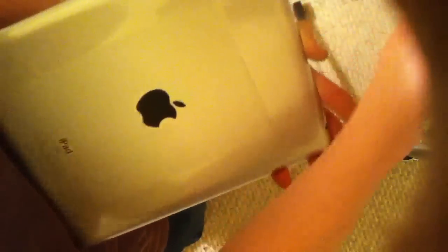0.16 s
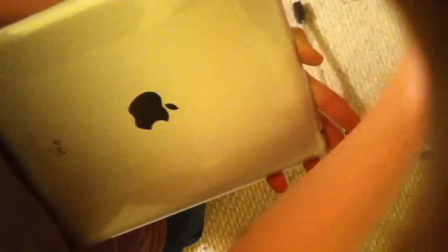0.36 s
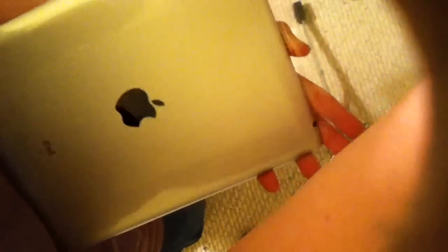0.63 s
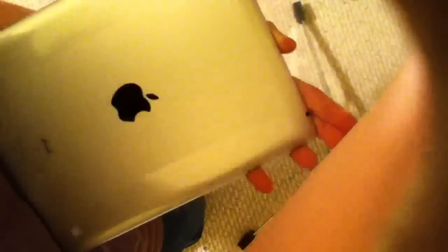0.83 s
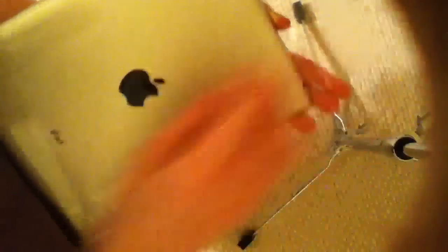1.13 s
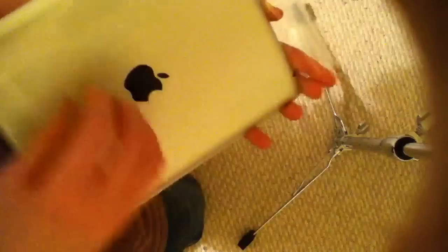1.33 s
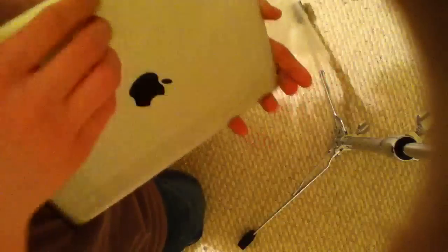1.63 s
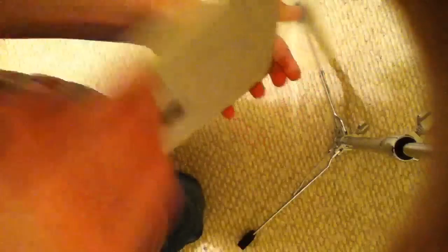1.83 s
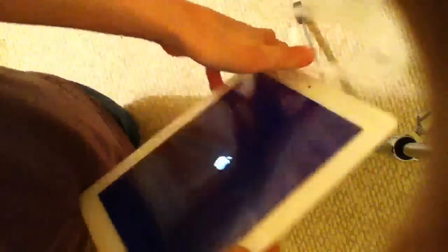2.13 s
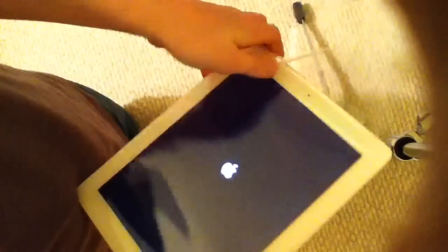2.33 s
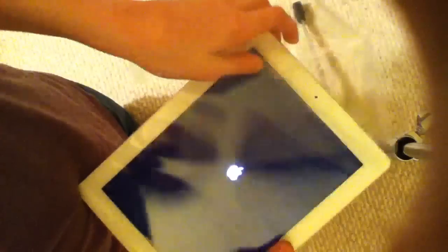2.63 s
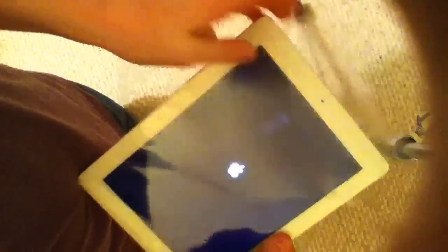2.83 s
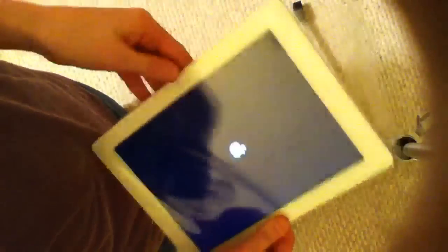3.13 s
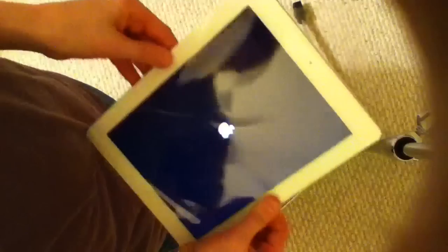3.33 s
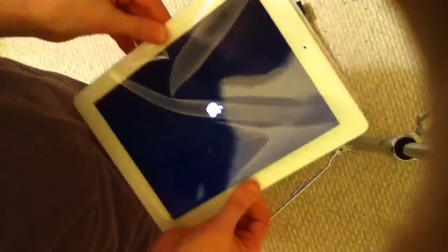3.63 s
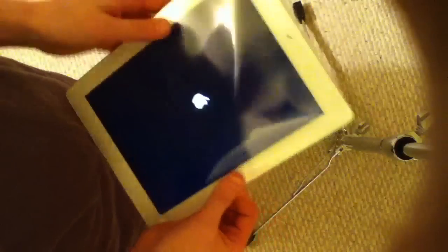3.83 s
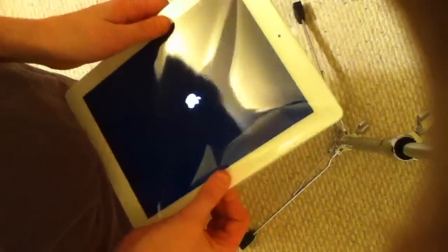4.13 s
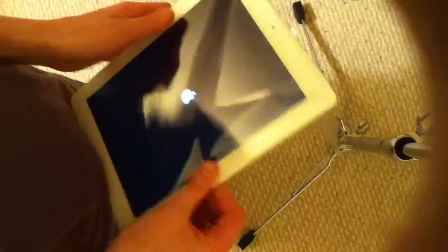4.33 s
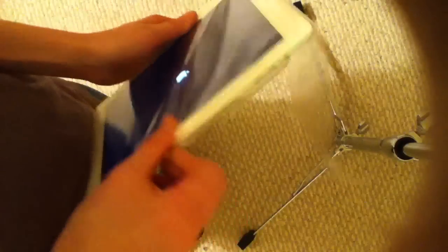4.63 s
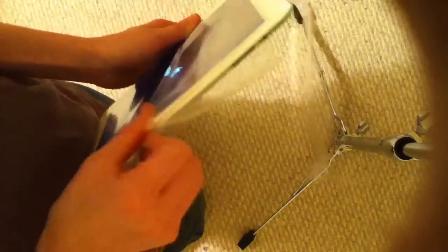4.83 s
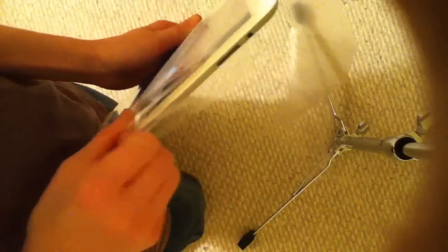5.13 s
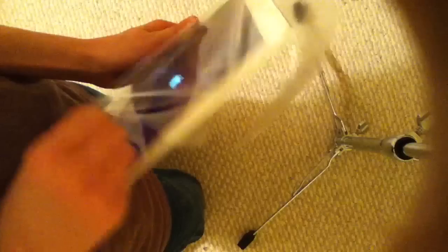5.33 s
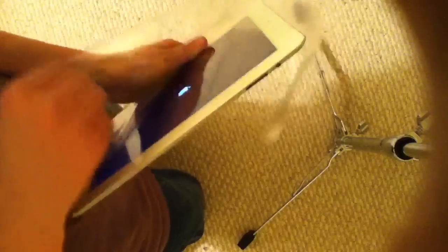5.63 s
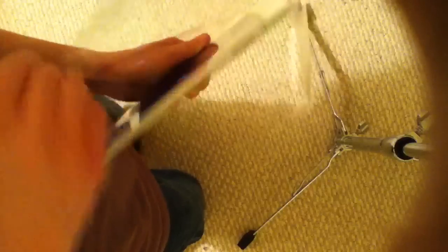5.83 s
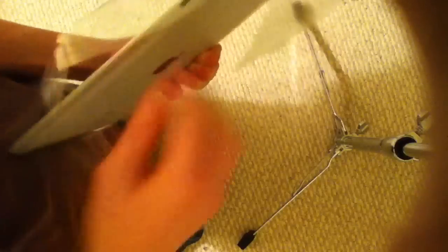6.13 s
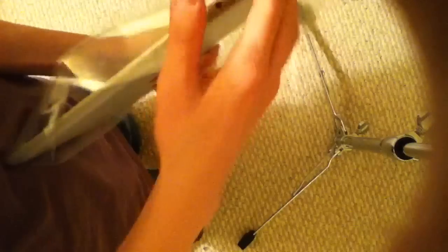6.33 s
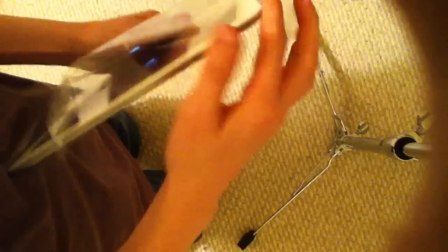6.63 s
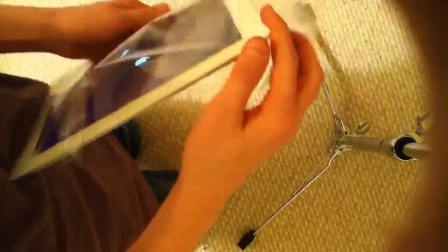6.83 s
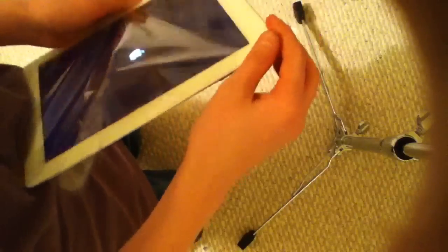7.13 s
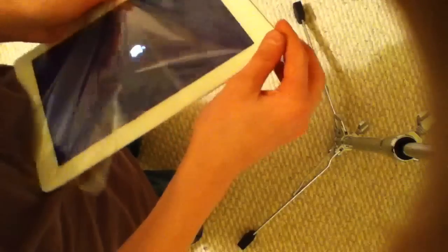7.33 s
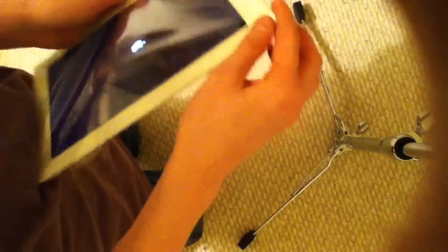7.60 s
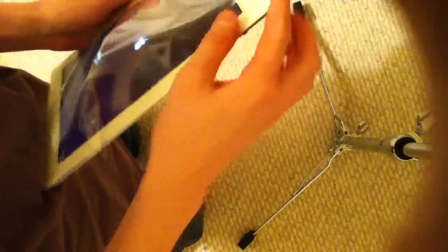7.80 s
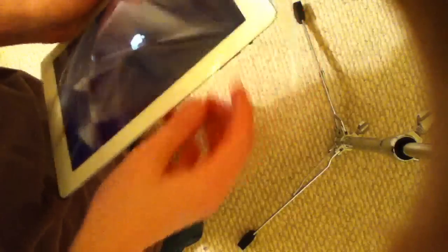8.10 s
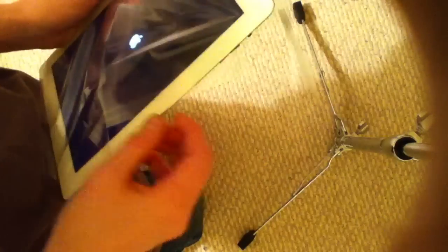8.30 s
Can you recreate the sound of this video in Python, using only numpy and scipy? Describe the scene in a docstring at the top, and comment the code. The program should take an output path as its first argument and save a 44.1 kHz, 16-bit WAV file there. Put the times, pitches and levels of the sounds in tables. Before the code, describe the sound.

Hands peel thin clear film from a glass-and-metal tablet. Sharp, bright snaps come at once, then thin to near quiet after a second. Crackles return irregularly, crowd together around the middle with the loudest scrunch, then scatter and shrink away. Close microphone in a carpeted room with a short soft tail, faint hiss and a very thin high whine.

```python
"""Hands peel a thin plastic film off a flat glass-and-metal slab held over a lap in a carpeted room.
Strong snaps come at once, then fewer; they crowd again, thickest past the middle, and shrink at the end.
Each snap is a crease flipping: short damped tones. Scrunches and rustling are filtered ticks and noise.
Nearby echoes and a short room tail answer every sound; steady hiss and a thin high whine lie below."""
import sys
import numpy as np
from scipy import signal
from scipy.fft import rfft, irfft, next_fast_len
from scipy.io import wavfile
from scipy.ndimage import uniform_filter1d

SR = 44100
rng = np.random.default_rng(int(sys.argv[2]) if len(sys.argv) > 2 else 0)


def int16_out(signal):
    """Quantize to a 16-bit WAV file."""
    q = np.round(np.clip(np.atleast_2d(signal).T, -1, 1) * 32767)
    wavfile.write(sys.argv[1], SR, q.astype(np.int16))


N = 373086  # length in samples

# how loudly the hands slide on the film: start_s, level_db (straight lines between rows)
RUSTLE_LEVEL = [(0, -38.5), (.1, -60.5), (.75, -58), (0.999, -64), (1.6, -53), (1.95, -57.5), (2.19, -48.5),
                (2.5, -58), (2.85, -61), (3.05, -56), (3.15, -46.5), (3.32, -54.5), (4.42, -54.5),
                (4.549, -45.5), (4.76, -68), (5.12, -65.5), (5.35, -38.5), (5.48, -37.5), (5.58, -56),
                (6.0, -49), (6.19, -54.5), (7.15, -53.5), (7.29, -62.5), (7.45, -55.5), (7.85, -60),
                (8.1, -54), (8.24, -69), (8.46, -68.5)]
# tone colour of the rustling film: pitch_hz, level_db (relative)
FILM_COLOUR = [(500, -30), (1000, -14), (2000, -6), (3300, -6), (4800, 0), (5600, -3), (6400, -13),
               (9000, -30)]
# tone colour of the film's finest creases: pitch_hz, level_db (relative)
SHEEN_COLOUR = [(4500, -55), (6500, -4), (8500, 4.5), (10500, 3), (12500, -7), (15000, -21), (16500, -13)]
USUAL_HZ = 4200  # usual ring of a snap


def amp(db):
    """Turns a level in dB into a gain."""
    return 10 ** (np.asarray(db) / 20)


def rms_one(x):
    """Scales a sound to an average strength (rms) of 1."""
    return x / np.sqrt(np.mean(x ** 2) + 1e-20)


def curve(rows, s):
    """Reads a table of start_s and value at the given times."""
    return np.interp(s, *np.transpose(rows))


def at_hz(points, hz):
    """Reads a table of pitch_hz and value, with pitch on a log scale."""
    points = np.array(points)
    return np.interp(np.log(np.maximum(hz, 1)), np.log(points[:, 0]), points[:, 1])


def coloured(x, spectrum):
    """Filters a sound by a tone-colour table and scales it to rms 1."""
    size = next_fast_len(len(x))
    gain = amp(at_hz(spectrum, np.fft.rfftfreq(size, 1 / SR)))
    filtered = irfft(rfft(x, size) * gain, size)[:len(x)]
    return rms_one(filtered)


def grains(per_s, spread_db, smooth, low_hz, high_hz):
    """Random ticks of very uneven size, each ringing briefly at one of six pitches, over friction noise."""
    sizes = amp(spread_db * np.minimum(rng.exponential(1, N), 4)) * rng.choice([-1, 1], N)
    ticks = sizes * (rng.random(N) < per_s / SR) + 1e-18  # never quite zero
    dealt = rng.integers(0, 6, N)
    ringing = 0
    for k, hz in enumerate(np.geomspace(low_hz, high_hz, 6)):
        edges = [hz / 1.3, min(hz * 1.3, 0.45 * SR)]
        band = signal.butter(2, edges, "band", fs=SR, output="sos")
        ringing = ringing + signal.sosfilt(band, ticks * (dealt == k)) / np.sqrt(hz)
    return rms_one(ringing) + smooth * rng.standard_normal(N)


def pops(hz, level_db, t60, rise, spread, top_hz, count):
    """One short pop a row: fading tones loosely spaced about its pitch, with its peak at its level."""
    t = np.arange(round(0.02 * SR)) / SR
    draw = rng.random((len(hz), count, 3))
    scatter = np.exp(spread * (2 * (np.arange(count) + draw[..., 0]) / count - 1))
    tone_hz = np.minimum(hz[:, None] * scatter, top_hz)
    phase = 2 * np.pi * (tone_hz[..., None] * t + draw[..., 1:2])
    shape = (1 - np.exp(-t / rise)) ** 2 * amp(-60 * t / t60)
    pop = shape * np.sum((0.42 + draw[..., 2:3]) * np.sin(phase), axis=1)
    return amp(level_db)[:, None] * pop / np.abs(pop).max(axis=1, keepdims=True)


def snaps():
    """A crease flips: the facet rings for a few cycles, with a bright crack and a thump of pushed air."""
    # larger creases snapping through: start_s, ring_db, ring_hz, crack_db (peaks before filtering)
    big_snaps = [(0.0044, -8.5, 4000, -3.5), (0.09, -25.5, 2120, -40), (0.1766, -28, 4000, -32),
                 (0.1963, -6.5, 4280, -3.5), (0.2006, -9.5, 3980, -5), (0.3654, -9, 4800, -2.5),
                 (0.512, -8.5, 4440, -3.5), (0.5154, -3.5, 5050, -23), (0.5485, -10, 4280, -0.5),
                 (0.5514, -6, 4300, -4.5), (0.5602, -5, 3860, -29), (0.6001, -18, 3900, -39),
                 (0.6448, -10.5, 2860, -33), (0.8107, -25, 3980, -29), (1.0675, -39, 4100, -55),
                 (1.1564, -34, 1380, -58.5), (1.6255, -13, 3000, -25), (1.7859, -22.5, 5120, -25.5),
                 (1.8528, -31, 4170, -40), (2.0185, -12, 3470, -19), (2.0539, -18.5, 3750, -28),
                 (2.082, -7, 3870, -12.5), (2.1708, -29.5, 4100, -19.5), (2.2408, -5.5, 3950, -9),
                 (2.2624, -4, 4220, -1.5), (2.445, -24.5, 5000, -22.5), (2.6968, -31, 3780, -39),
                 (2.8982, -16, 3860, -17.5), (2.912, -10.5, 3840, -33), (2.9875, -18, 3710, -41),
                 (2.9937, -20.5, 3740, -30), (3.1698, -20, 2570, -29), (3.1784, -25, 4400, -22),
                 (3.569, -14.5, 1850, -15.5), (3.5908, -18, 4160, -32.5), (3.606, -15, 5500, -37),
                 (3.6128, -13, 4900, -9), (3.6281, -6, 4850, -17), (3.6553, -10, 4800, -9),
                 (3.662, -14, 5000, -16), (3.699, -20.5, 4900, -13.5), (3.8316, -7.5, 4400, -1.5),
                 (3.8371, -4, 5600, -11), (3.8503, -8, 4430, -19), (3.855, -17.5, 4160, -30),
                 (3.9253, -29, 3970, -28), (4.1919, -34, 3500, -42), (4.2135, -25, 4000, -38),
                 (4.2614, -28, 3900, -35), (4.2826, -27.5, 3600, -31.5), (4.3537, -33, 4320, -33.5),
                 (4.4356, -24, 3920, -30), (4.4744, -12.5, 4230, -15.5), (4.5566, -6, 5400, -11),
                 (4.6053, -22, 5230, -6), (4.6172, -2.5, 4970, -13), (4.6226, -15, 3800, -10),
                 (4.6732, -12.5, 4400, -22), (4.69, -8, 4370, -13), (4.6935, -21, 4600, -13.5),
                 (4.94, -18.5, 4860, -10), (4.9444, -25, 4800, -19.5), (5.1293, -19, 4520, -23.5),
                 (5.1822, -19, 4000, -46.5), (5.2166, -3.5, 4200, -10), (5.269, -19, 4360, -11),
                 (5.3193, -1.5, 3630, 0), (5.3255, -7, 3970, -2), (5.3688, -1, 4650, -8),
                 (5.3744, -9.5, 3350, -21.5), (5.4011, -11, 3500, -13), (5.4156, -20, 3500, -18),
                 (5.444, -13, 4000, -13.5), (5.4604, -6.5, 4020, -18.5), (5.4658, -22.5, 4170, -16.5),
                 (5.4827, -16, 4100, -27), (5.5198, -5.5, 4170, -28), (5.5362, -9, 3980, -12),
                 (5.6039, -26.5, 3860, -30.5), (5.652, -19, 2880, -42.5), (5.7152, -20.5, 3950, -49.5),
                 (5.728, -20, 2580, -27), (5.7378, -22, 3100, -47), (5.7719, -27, 3900, -23.5),
                 (5.7905, -20, 1340, -43), (5.8106, -19.5, 3660, -28.5), (5.8998, -24, 2830, -49),
                 (5.9341, -26, 3590, -33.5), (5.959, -22, 2870, -53), (5.969, -17.5, 4000, -19),
                 (6.0349, -19, 3160, -22), (6.2028, -25, 4560, -28), (6.2532, -27, 5600, -35),
                 (6.3465, -5.5, 4060, -11.5), (6.3504, -8, 3970, -7.5), (6.3811, -4, 4560, -17),
                 (6.4404, -17.5, 4160, -30), (6.4872, -27.5, 4860, -32), (6.5701, -24, 3600, -35),
                 (6.8169, -15.5, 4800, -22.5), (6.8473, -21.5, 4180, -22.5), (6.8798, -20, 4320, -48),
                 (7.0336, -20, 3770, -29), (7.056, -23, 3760, -46), (7.0626, -19.5, 3360, -21),
                 (7.0916, -22, 4350, -35), (7.1081, -11, 4700, -14.5), (7.1397, -6.5, 4300, -12),
                 (7.1775, -15, 4200, -44), (7.224, -31, 4090, -29), (7.2477, -30, 4130, -31.5),
                 (7.3189, -18, 4220, -15), (7.378, -16, 4950, -23), (7.413, -22, 3500, -24),
                 (7.4224, -17, 3760, -31), (7.4342, -18.5, 3800, -20), (7.4472, -22, 4150, -16),
                 (7.4819, -22, 4000, -40), (7.522, -29, 4080, -47), (7.5803, -29, 3440, -35),
                 (7.6073, -14, 4200, -19.5), (7.7053, -25, 4420, -26.5), (7.7532, -25, 3740, -30.5),
                 (7.9789, -18, 3870, -52), (8.0111, -13.5, 4500, -17.5), (8.0236, -21, 4400, -41),
                 (8.0602, -18, 2660, -34), (8.1233, -5, 4180, -23), (8.252, -28.5, 4140, -23),
                 (8.3141, -38, 1690, -75.5), (8.3487, -31.5, 3300, -65.5)]
    # base level of the thump, for a 0 dB ring at the usual pitch: start_s, level_db
    thump_level = [(0, -28), (.7, -22), (1.6, -48), (2.3, -27), (3.2, -29.5), (3.7, -38), (4.4, -37.5),
                   (4.9, -53), (5.35, -31), (6.0, -37.5), (7.1, -32.5), (7.6, -44), (8.46, -40)]
    thump_follows = 0.53  # share of the ring's dB
    thump_db_per_octave, thump_scatter_db = -4.5, 4.5  # lower rings thump more

    s, ring_db, ring_hz, crack_db = np.r_[big_snaps, small_snaps()].T
    octaves = np.log2(ring_hz / USUAL_HZ)
    thump_db = curve(thump_level, s) + thump_follows * ring_db + thump_db_per_octave * octaves
    thump_db = thump_db + thump_scatter_db * rng.standard_normal(len(s))
    flat = np.ones(len(s))

    ring = pops(ring_hz, ring_db, t60=0.0025, rise=0.0001, spread=0.26, top_hz=5380, count=5)
    # wider facets answer an octave below, the more so the bigger the thump
    wide_db = (ring_db + thump_db) / 2 - 4
    wide = pops(ring_hz / 2, wide_db, t60=0.004, rise=0.0002, spread=0.5, top_hz=4000, count=5)
    pop = signal.sosfilt(signal.butter(2, 800, "high", fs=SR, output="sos"), ring + wide)
    crack = pops(9800 * flat, crack_db, t60=0.0035, rise=0.0001, spread=0.4, top_hz=15500, count=14)
    pop = pop + signal.sosfilt(signal.butter(2, 10500, fs=SR, output="sos"), crack)
    thump = pops(600 * flat, thump_db, t60=0.0066, rise=0.0007, spread=0.79, top_hz=1500, count=3)
    pop = pop + signal.sosfilt(signal.butter(2, 220, "high", fs=SR, output="sos"), thump)

    out = np.zeros(N + pop.shape[1])
    for start, one in zip(np.round(s * SR).astype(int), pop):
        out[start:start + len(one)] += one
    return out[:N]


def small_snaps():
    """Lesser creases flip at random, more often and louder when the hands rustle more; rows for snaps()."""
    per_s, crowding = 7.6, 0.6  # average rate; how much rustle draws them
    over_rustle_db, scatter_db = 18, 8  # near the loudest, above the rustle; most fall below it
    crack_step_db = -6  # least drop from ring to crack

    draw = rng.random((round(per_s * N / SR), 4))
    t = np.arange(N) / SR
    chance = np.cumsum(amp(crowding * curve(RUSTLE_LEVEL, t)))
    s = np.interp(draw[:, 0] * chance[-1], chance, t)
    ring_db = curve(RUSTLE_LEVEL, s) + over_rustle_db + scatter_db * np.log(draw[:, 1] + 0.064)
    ring_hz = USUAL_HZ * np.exp(0.6 * draw[:, 2] - 0.4)
    crack_db = ring_db + crack_step_db - 8 * draw[:, 3]
    return np.c_[s, ring_db, ring_hz, crack_db]


def scrunches():
    """Bursts of dense creasing start fast and fade, bright from the film, duller from hand and slab."""
    # scrunches and slaps, many creases at once: start_s, length_s, film_db, body_db, body_hz
    bursts = [(0.626, 0.085, -36.5, -38, 507), (0.833, 0.066, -62, -51.5, 1180),
              (1.848, 0.011, -45.5, -50.5, 600), (2.155, 0.034, -40.5, -47.5, 1000),
              (2.609, 0.13, -50, -55.5, 1210), (2.875, 0.064, -43, -57, 1500),
              (2.907, 0.051, -33, -32.5, 1750), (2.988, 0.0097, -35.5, -61, 1500),
              (3.152, 0.076, -36, -47, 1500), (3.409, 0.15, -47, -60, 990), (3.845, 0.03, -64, -46, 497),
              (4.459, 0.025, -43, -43.5, 596), (4.765, 0.05, -59.5, -46.5, 496),
              (5.375, 0.039, -30, -45, 1200), (5.903, 0.026, -39.5, -42.5, 1150),
              (7.055, 0.017, -33, -60, 1500), (7.413, 0.033, -43.5, -54, 1000)]
    sheen_db = -9  # beside the film's main sound

    t = np.arange(N) / SR
    film, body = np.zeros(N), np.zeros(N)
    knead = grains(1500, spread_db=4.5, smooth=0.3, low_hz=293, high_hz=3000)
    for start, length, film_db, body_db, body_hz in bursts:
        span = slice(round(start * SR), round((start + length) * SR))
        u = (t[span] - start) / length  # 0 to 1 through the burst
        shape = np.clip(np.minimum(u / 0.17, (1 - u) / 0.5), 0, 1)
        band = signal.butter(2, [body_hz / 3.0, body_hz * 2.4], "band", fs=SR, output="sos")
        film[span] += amp(film_db) * shape
        body[span] += amp(body_db) * shape * rms_one(signal.sosfilt(band, knead[span]))
    crush = grains(3000, spread_db=4.0, smooth=0.6, low_hz=1500, high_hz=11000)
    bright = coloured(crush, FILM_COLOUR) + amp(sheen_db) * coloured(crush, SHEEN_COLOUR)
    return body + film * bright


def rustle():
    """Skin drags over the film: fine ticks in friction noise, and a dull rumble through the slab."""
    # tone colour of the handled slab and lap: pitch_hz, level_db (relative)
    slab_colour = [(120, 7), (250, -4), (500, 0.5), (900, -2.5), (1800, -8.5), (4000, -32.5)]
    usual_db, sheen_db, rumble_db = -55, -62, -63.5  # levels when the rustle is at its usual strength
    sheen_follows, rumble_follows = 1, 0.74  # share of the rustle's swing in dB

    film_db = curve(RUSTLE_LEVEL, np.arange(N) / SR)
    swing = film_db - usual_db
    film = amp(film_db)
    sheen = amp(sheen_db + sheen_follows * swing)
    body = amp(rumble_db + rumble_follows * swing)
    # the grip wavers by about 2 dB, slower than 25 Hz
    slow = signal.sosfilt(signal.butter(2, 25, fs=SR, output="sos"), rng.standard_normal(N))
    grip = amp(2.1 * rms_one(slow))
    drag = grip * grains(600, spread_db=3.7, smooth=1.3, low_hz=1200, high_hz=9000)
    rumble = grains(300, spread_db=2.5, smooth=1.2, low_hz=200, high_hz=1500)
    bright = film * coloured(drag, FILM_COLOUR) + sheen * coloured(drag, SHEEN_COLOUR)
    return bright + body * coloured(rumble, slab_colour)


def echoes(x):
    """A few single, slightly dulled reflections from near surfaces."""
    # reflections from slab, lap, floor and walls: delay_s, level_db (in the bass; less treble)
    reflections = [(.0036, -15), (.0061, -22.5), (.0089, -19.5), (0.0149, -22), (0.018, -26.5)]
    taps = np.zeros(round(0.03 * SR))
    for delay, level_db in reflections:
        taps[round(delay * SR)] += amp(level_db)
    dulled = signal.lfilter([0.6], [1, -0.4], taps)
    return signal.fftconvolve(x, dulled)[:N]


def room(x, count=6):
    """The hands keep moving, so every 40 ms of sound meets one of several echo patterns."""
    step = 1764  # 40 ms in samples
    place = np.repeat(rng.integers(0, count, N // step + 1), step)[:N]
    # short crossfades between the patterns
    share = [uniform_filter1d(1.0 * (place == k), size=200) for k in range(count)]
    return sum(signal.oaconvolve(x * part, tail())[:N] for part in share)


def tail():
    """Lumpy echoes set in a few ms after the direct sound and die band by band."""
    # time the room takes to fade by 60 dB: pitch_hz, fade_s
    fade_times = [(300, 0.3), (1000, 0.23), (3000, 0.19), (6000, 0.16), (10000, 0.095), (15000, 0.11)]
    first_echo_s, build_up_s = 0.0021, 0.0048

    t = np.arange(round(0.4 * SR)) / SR
    lumps = amp(3.1 * rms_one(signal.lfilter([1], [1, -0.97], rng.standard_normal(len(t)))))
    white = lumps * rng.standard_normal(len(t))
    edges = 70 * 2 ** np.arange(0, 8.1, 0.5)  # half-octave bands, Hz
    out = 0
    for low, high in zip(edges, edges[1:]):
        band = signal.sosfilt(signal.butter(2, [low, high], "band", fs=SR, output="sos"), white)
        out = out + band * amp(-60 * t / at_hz(fade_times, np.sqrt(low * high)))
    out = out * np.clip((t - first_echo_s) / build_up_s, 0, 1)
    return out / np.sqrt(np.sum(out ** 2))


def floor():
    """Hiss of room and microphone, its bass unsteady, with a thin whine that wavers a little."""
    # tone colour of the hiss: pitch_hz, level_db (relative)
    hiss_colour = [(25, -31), (60, 7.5), (160, 9.5), (500, -1.5), (1100, -7), (4500, -31), (10000, -17),
                   (14000, -9.5), (16500, -46)]
    # slow swelling and sinking of its bass: start_s, gain_db
    bass_swell = [(0, 4.5), (.7, 7), (1.1, -1.5), (2.8, 6), (4.2, 1.5), (4.9, -2.5), (6.5, 2.5),
                  (7.3, -6.5), (8.46, -7.5)]
    hiss_db, bass_hz = -65, 180  # level before the bass swells; top of the bass
    whine_hz, whine_db, waver_hz = 14993, -71, 4.0

    waver = rms_one(signal.lfilter([1], [1, -0.9995], rng.standard_normal(N)))
    phase = 2 * np.pi * np.cumsum(whine_hz + waver_hz * waver) / SR
    whine = np.sqrt(2) * amp(whine_db) * np.sin(phase)
    hiss = coloured(rng.standard_normal(N), hiss_colour)
    bass = signal.sosfiltfilt(signal.butter(2, bass_hz, fs=SR, output="sos"), hiss)
    swollen = amp(curve(bass_swell, np.arange(N) / SR)) * bass
    return amp(hiss_db) * (hiss - bass + swollen) + whine


def scene():
    """Adds up film and hands, their echoes, the room and the floor of hiss and whine."""
    room_db = -7.5
    near = snaps() + scrunches() + rustle()
    return (near + echoes(near) + amp(room_db) * room(near) + floor())[None]


def record(dry):
    """Rounds off the loudest peaks and cuts the highest treble."""
    peak_limit, cutoff_hz = 0.62, 17000  # limit before the treble cut (full scale is 1)
    held = dry / (1 + np.abs(dry / peak_limit) ** 4) ** (1 / 4)
    return signal.sosfilt(signal.cheby2(12, 60, cutoff_hz, fs=SR, output="sos"), held)


dry = scene()
out = record(dry)
int16_out(out)
```